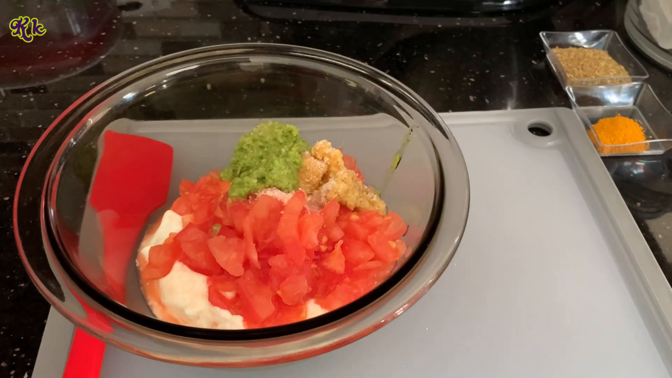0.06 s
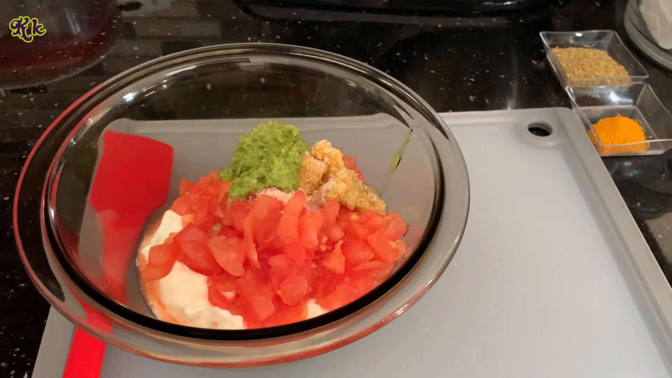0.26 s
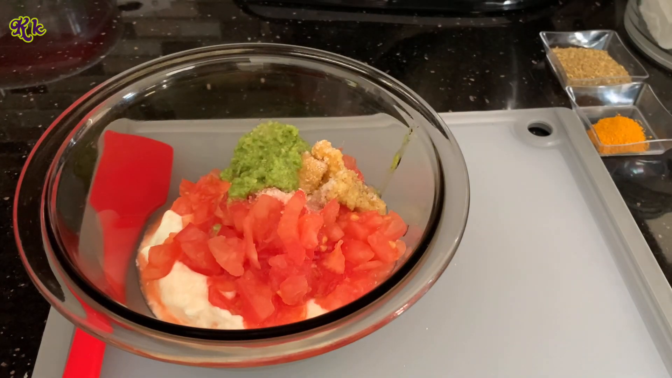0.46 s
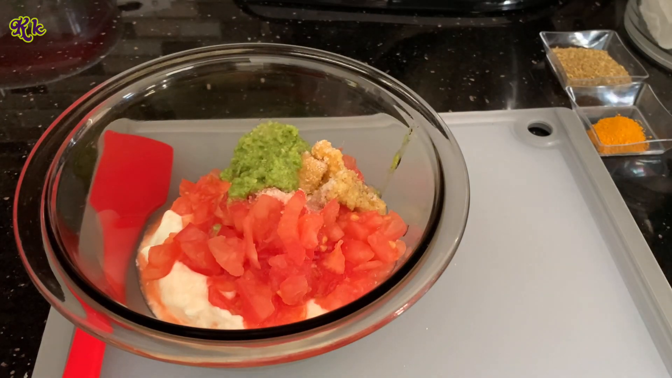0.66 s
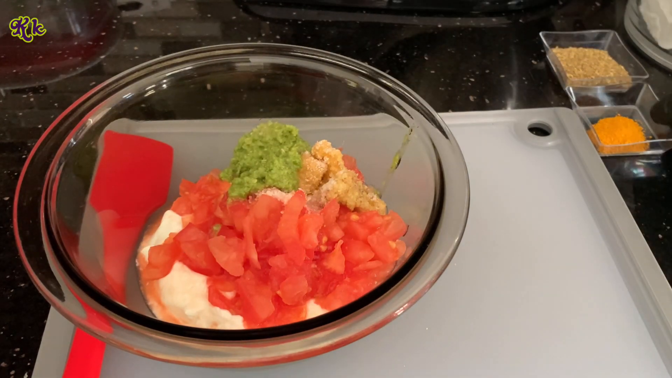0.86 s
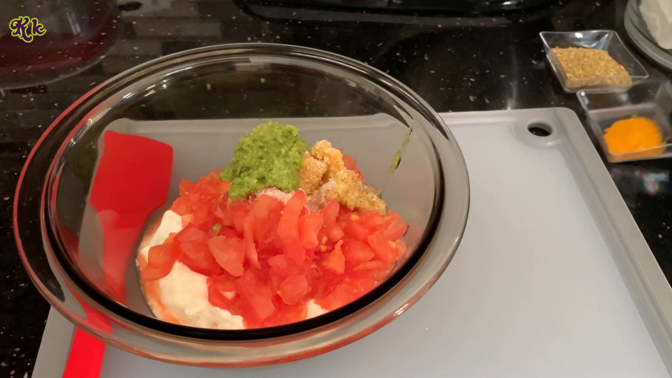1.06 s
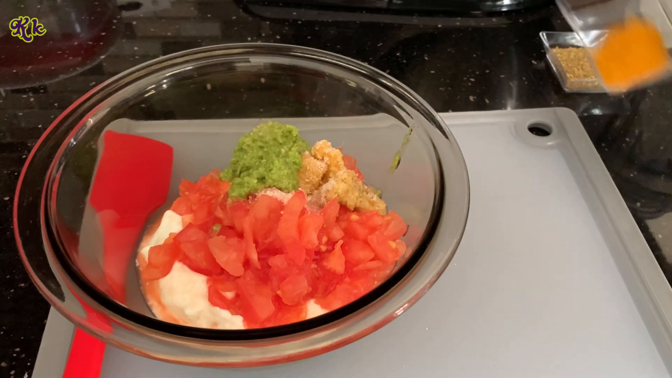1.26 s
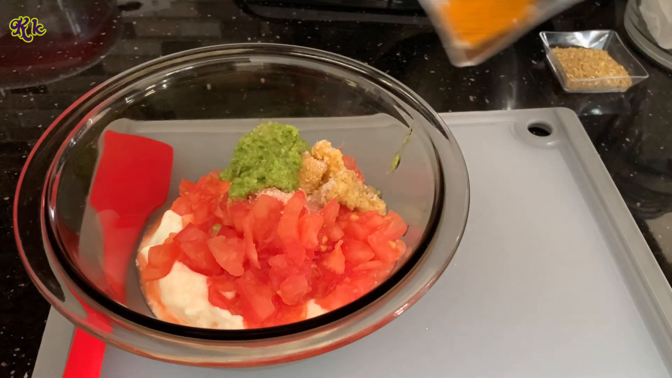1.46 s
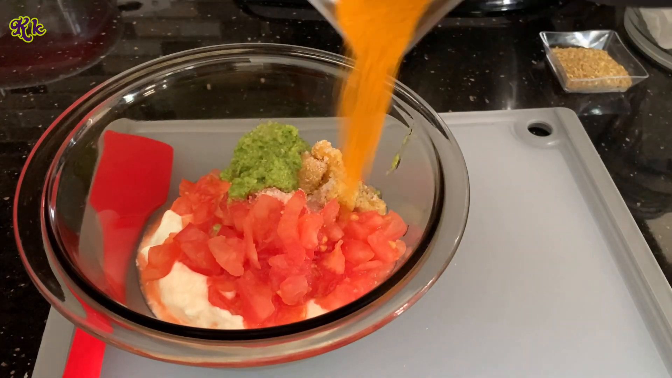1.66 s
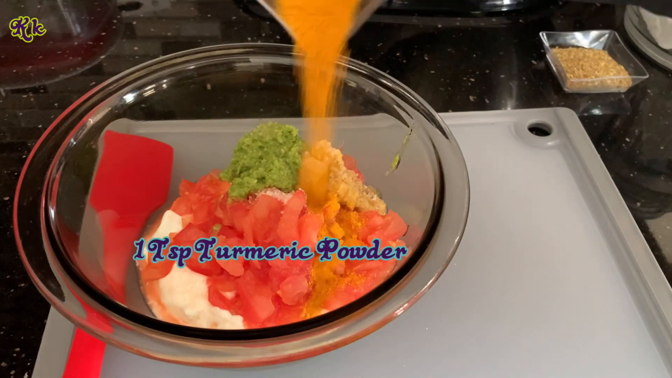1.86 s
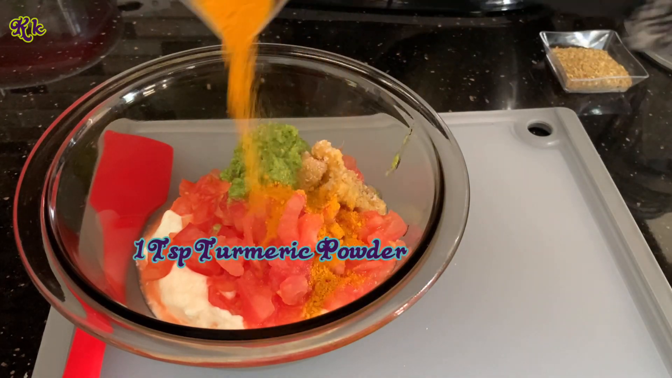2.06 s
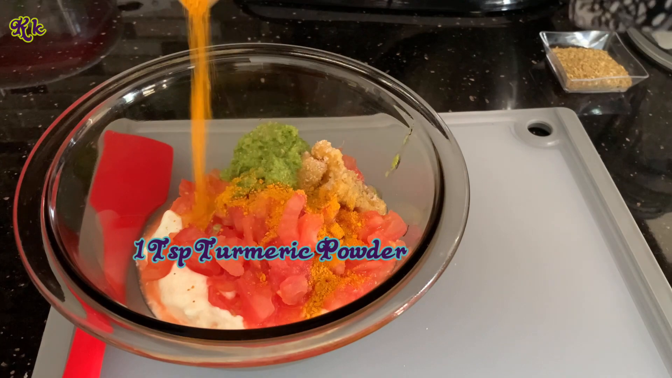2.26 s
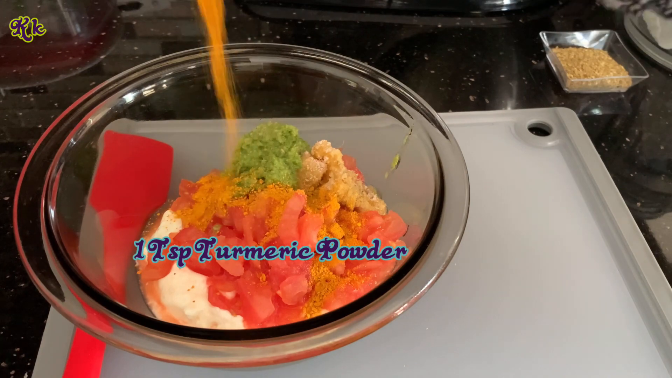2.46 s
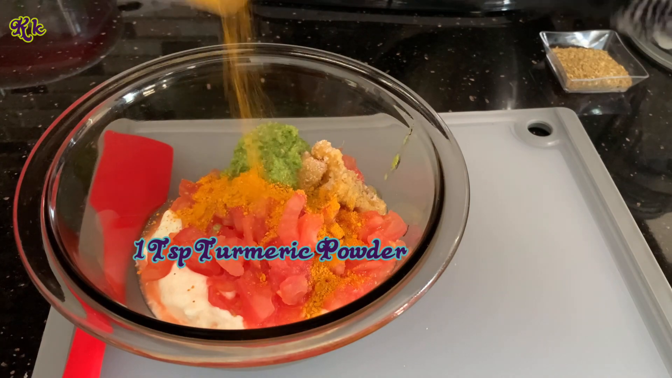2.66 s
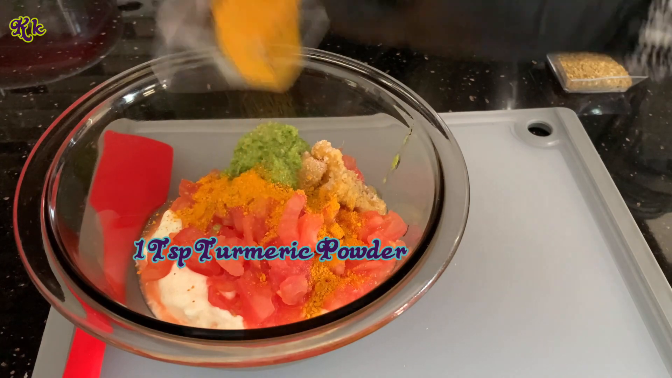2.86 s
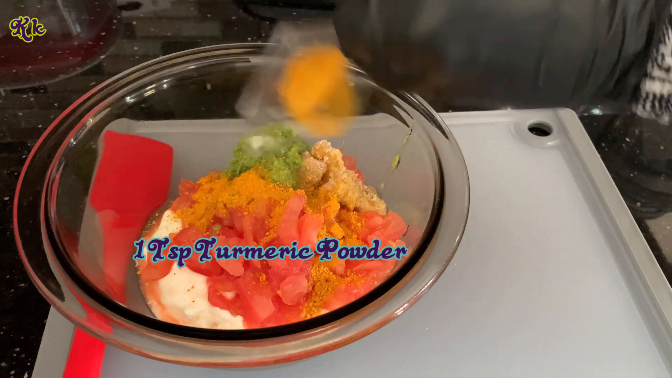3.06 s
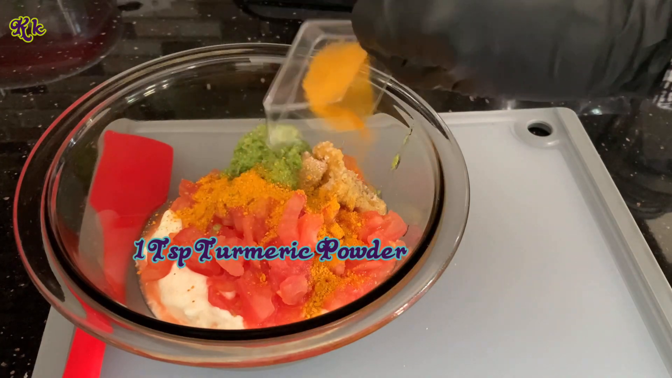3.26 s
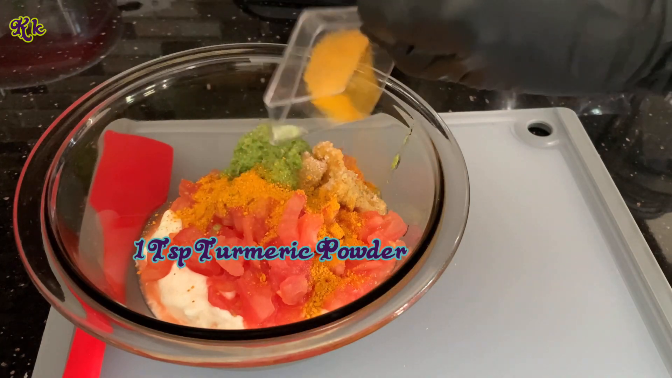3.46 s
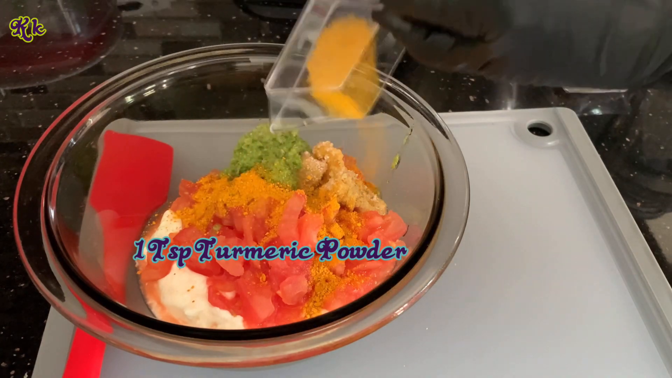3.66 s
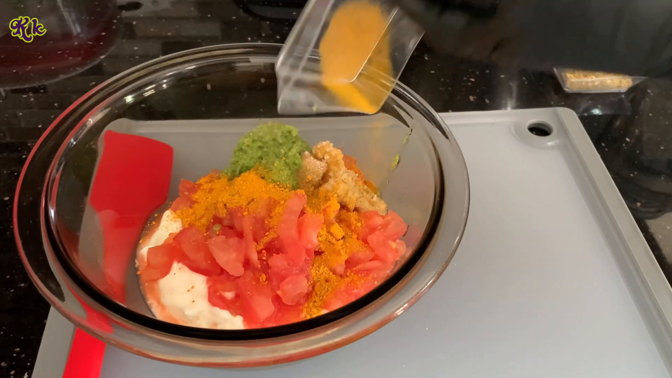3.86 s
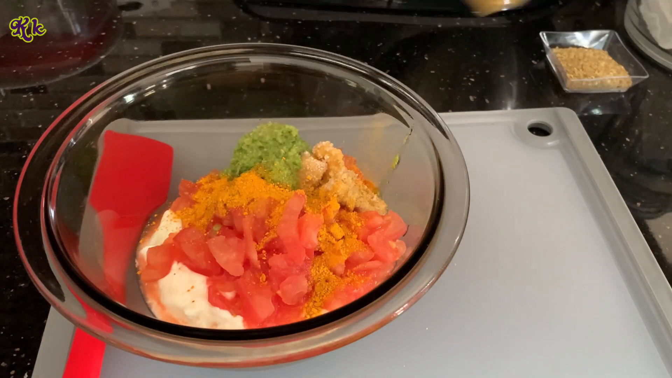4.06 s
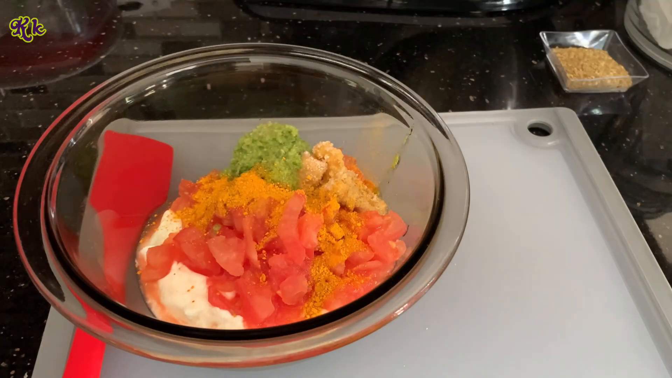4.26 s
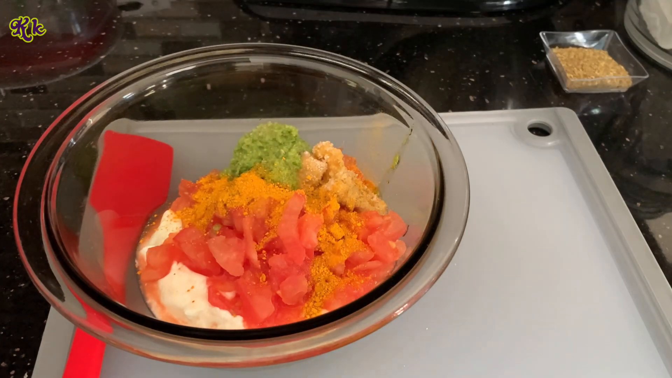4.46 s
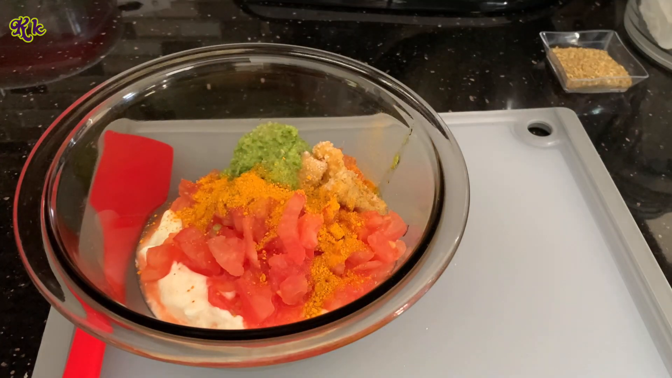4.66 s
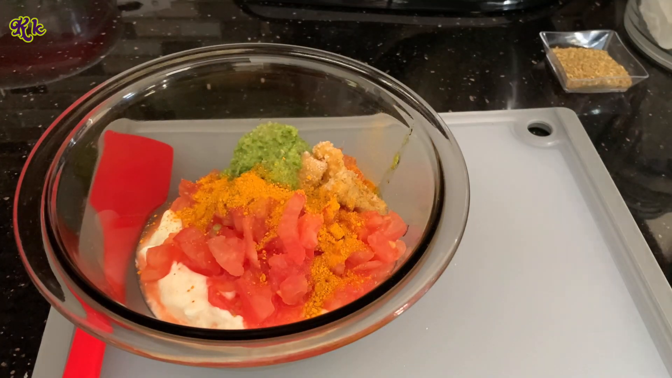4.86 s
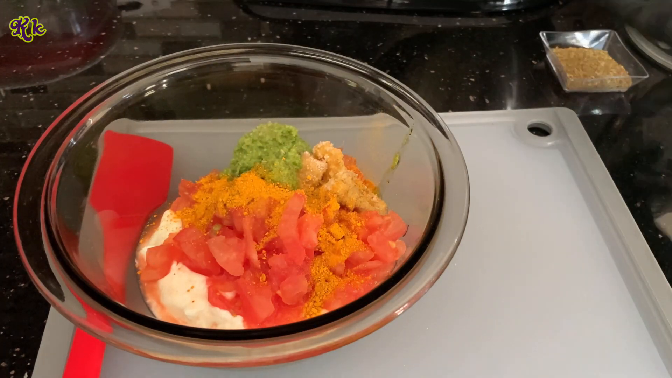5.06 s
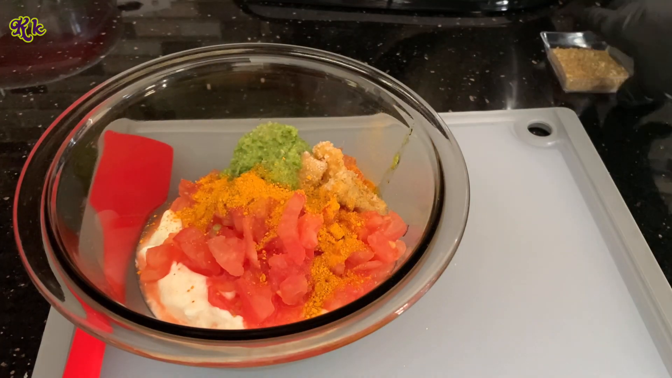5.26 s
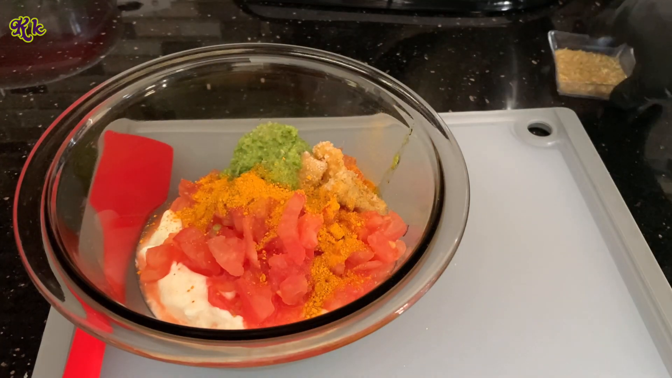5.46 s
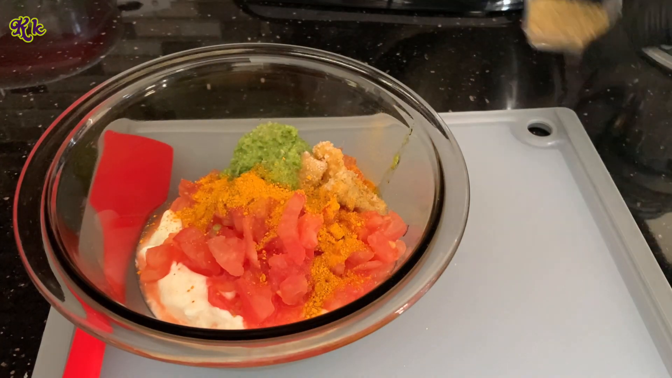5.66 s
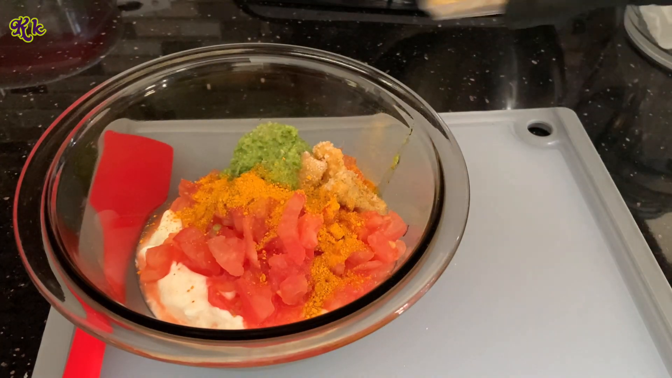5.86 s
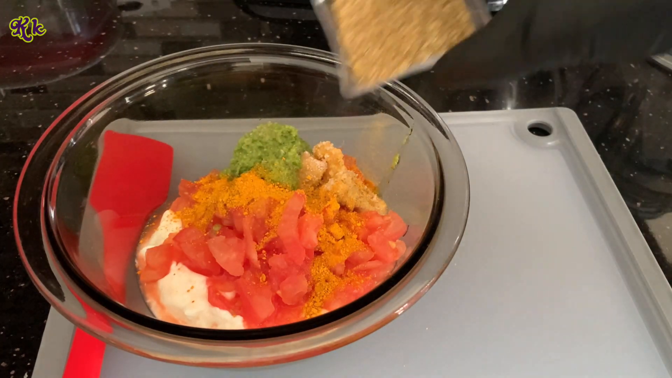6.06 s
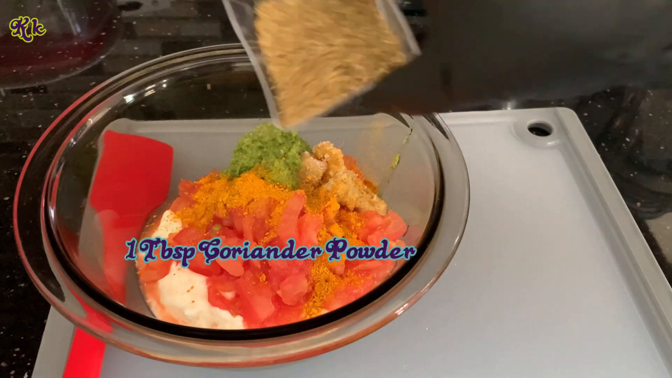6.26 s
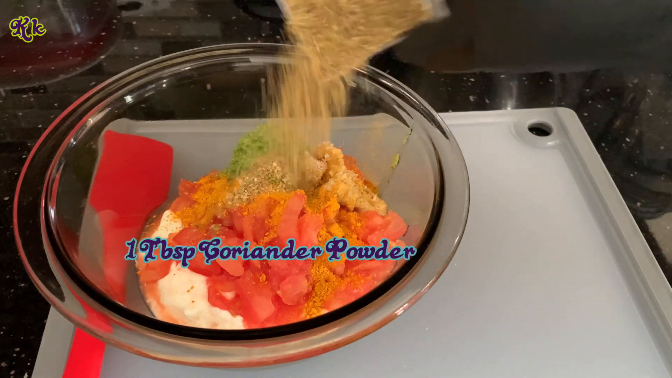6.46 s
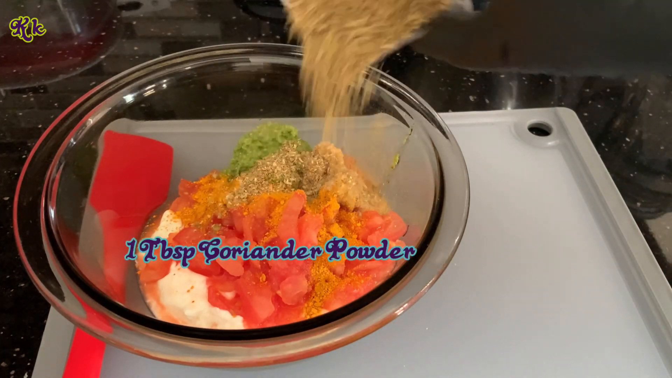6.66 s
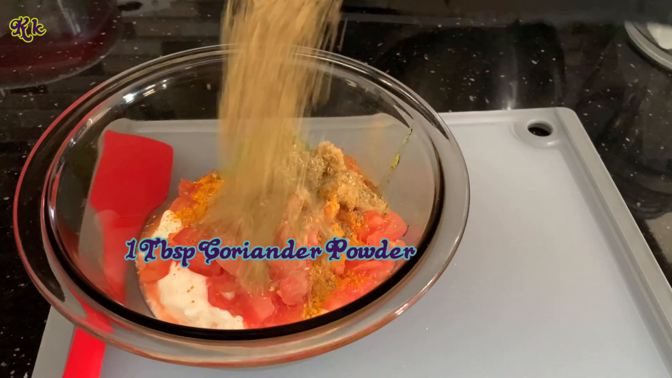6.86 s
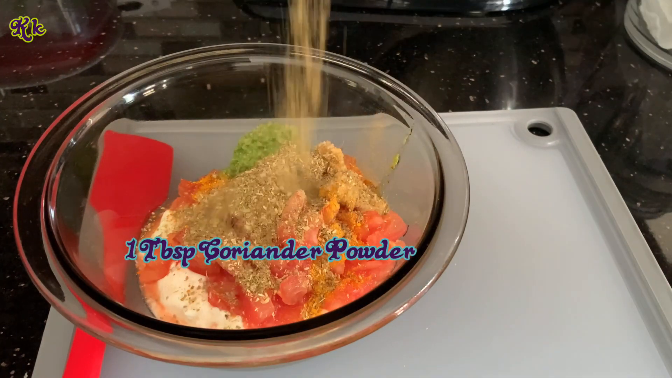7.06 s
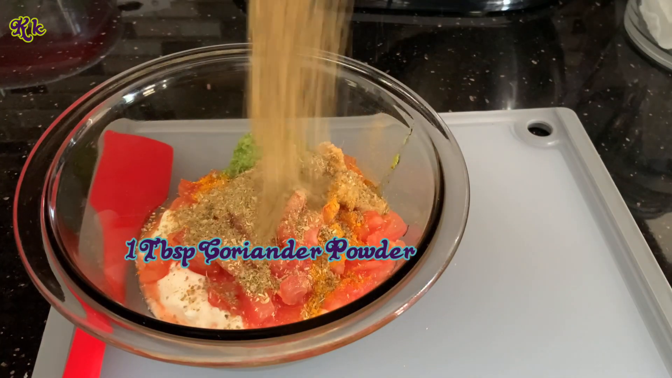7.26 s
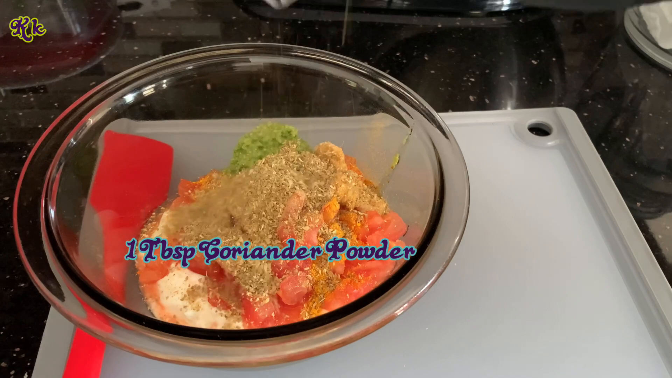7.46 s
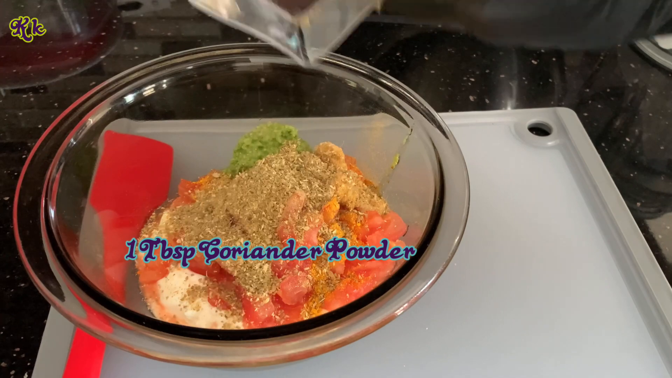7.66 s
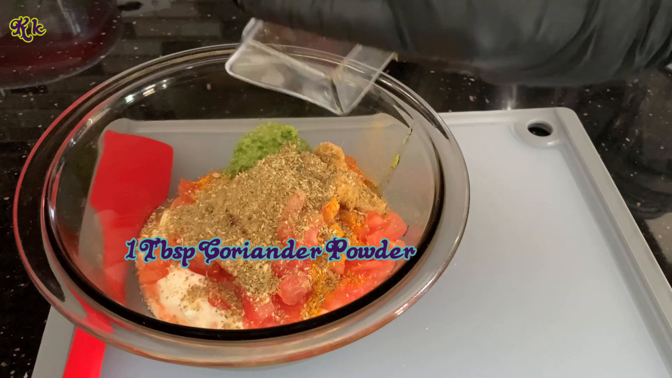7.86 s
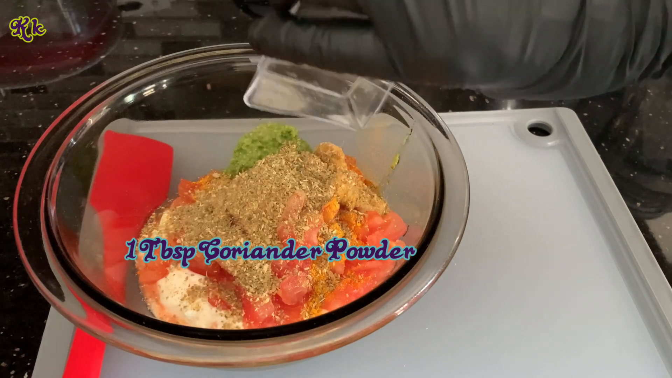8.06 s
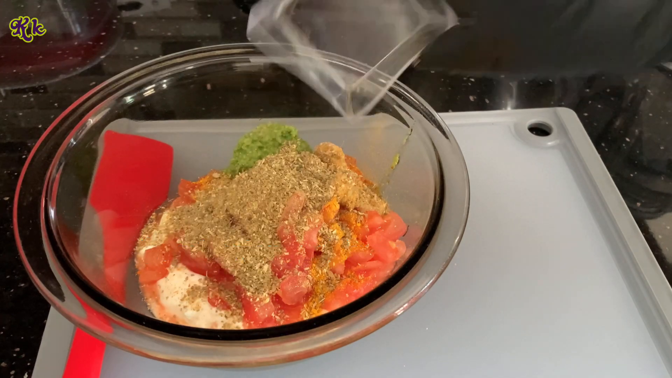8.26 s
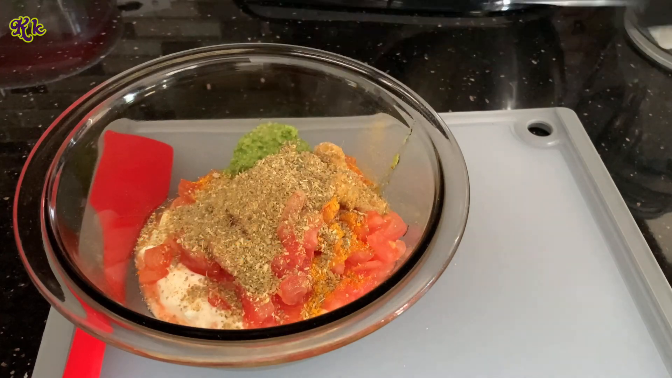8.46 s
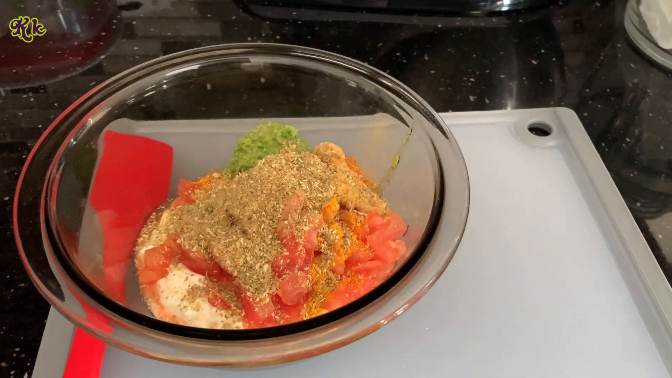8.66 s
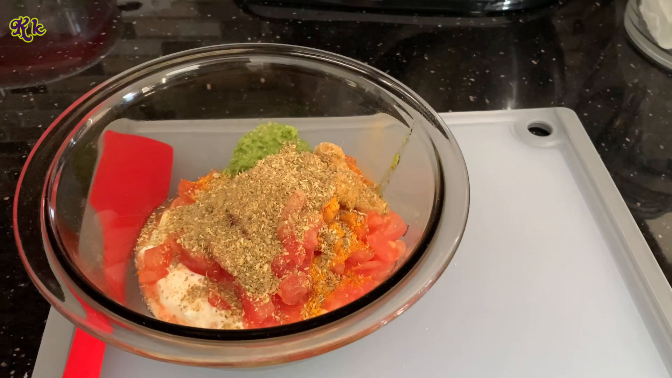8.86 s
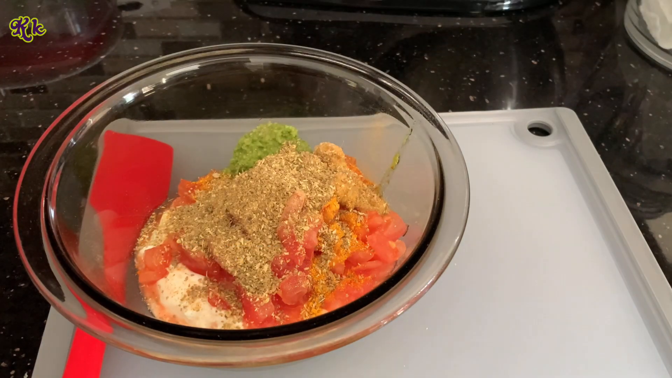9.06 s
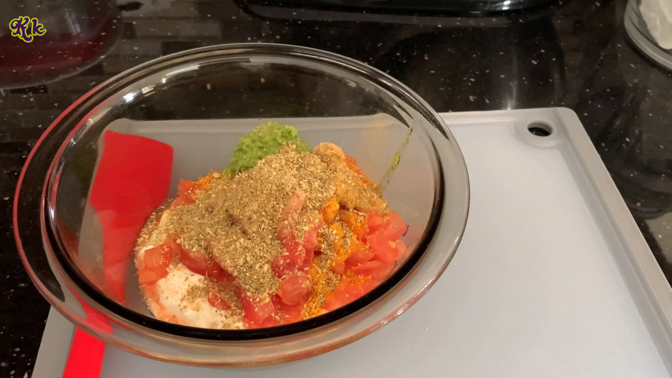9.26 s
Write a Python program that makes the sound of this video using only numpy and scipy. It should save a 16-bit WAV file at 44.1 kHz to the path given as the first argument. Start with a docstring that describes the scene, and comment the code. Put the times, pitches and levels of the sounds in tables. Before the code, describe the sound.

A quiet small kitchen, heard close in stereo, with soft low rumble and a faint wavering appliance hum, slightly stronger on the right. At about 0.15 to 0.35 seconds a tight flurry of hard plastic clacks on stone grows louder as a dish is picked up. Near-quiet follows until a very soft tick at 3.1, then three clearer light taps on a glass bowl at 3.2, 3.55 and 3.75, each with a tiny rebound and a slight glassy ring. Around 4.55 to 4.8 the dish clacks on the counter, ending in one sharp, bright hit. From 6.1 to 7.5 falling powder makes an extremely faint high hiss. Two hard, heavier knocks strike the bowl rim at 7.95 and 8.1, with a short high ring. Softer counter clacks come at 8.9 and 9.15 to 9.3, fading into short, lively room echoes.

```python
"""Hard clacks on a stone counter come first: two small plastic spice dishes are picked up.
Light taps make a glass bowl ring and a dish is set down; powder hisses, two hard knocks hit
the rim and a dish clacks on the counter again. A small kitchen echoes and an appliance hums.
Knocks are shaped noise bursts, rings are fading sine waves, and hiss, hum and echoes are filtered noise."""
import sys
import numpy as np
from scipy import signal
from scipy.fft import rfft, irfft, next_fast_len
from scipy.io import wavfile
from scipy.ndimage import uniform_filter1d

SR = 44100
rng = np.random.default_rng(int(sys.argv[2]) if len(sys.argv) > 2 else 0)


def materialize(psi):
    """Save the field psi as 16-bit PCM at rate SR to the path in sys.argv[1].

    A 1-D psi becomes a single channel; in a 2-D psi each row is a channel.
    """
    bounded = np.clip(np.atleast_2d(psi).T, -1, 1)
    quanta = np.round(bounded * 32767).astype(np.int16)
    wavfile.write(sys.argv[1], SR, quanta)


N = 411012

# Notes of the ringing bowl; a note may have a close second tone, so that it swells and dips:
# f/Hz, t60/s, level when tapped/dB, level when knocked/dB, left minus right/dB,
# distance of the second tone/Hz, share of the second tone 0-1
BOWL_NOTES = [(1003, 1, -27.5, -41, -1, 3.3, 0.3), (1038.7, 0.89, 4.5, -48.5, 2.5, 1, .05),
              (1010, 0.077, -26, -8.5, 3.5, 22, 1), (1105, .14, -31, -18.5, 2, 20, .2),
              (1260, 0.19, 2.5, -38.5, 0.5, 6.8, 0.06), (1880, .35, -27, -36.5, 7, 16, 0.2),
              (1800, 0.73, -19.5, -38.5, 12.5, 18, 0.6), (2080, 0.56, -20, -26.5, 4.5, 33, 0.5),
              (2794, .5, -17, -10, 3, 13, .65), (3000, .2, -16, -25.5, -10, 18, 0.2),
              (4500, 0.068, -1, -21, -5, 12, 0.2), (4900, .1, -27, -24.5, 2, 23, .2),
              (5117, 0.14, -8.5, -1, -2.5, 22, .1), (5106, 0.3, -43, -19.5, 9, 15, 0.2),
              (8900, .12, -7, -41.5, 6.5, 24, .2), (9700, .09, -8, -24, -4, 46, 0),
              (13700, .08, -14, -37.5, -2.5, 30, .3)]
# Light taps of the first dish on the bowl:
# t/s, contact level/dB, hollow of the dish f/Hz, bowl ring level/dB,
# rebound level relative to the tap/dB, bowl note favoured by the spot struck f/Hz
BOWL_TAPS = [(3.0811, -12.5, 1320, -53, -23, 2792), (3.2206, 0.5, 1240, -41.5, -7, 5110),
             (3.5495, 1, 1690, -47, -11, 5110), (3.7385, 0.5, 1690, -43.5, 0, 2792)]
# Tone of a tap: f/Hz, level per Hz/dB
TAP_TONE = [(150, -10), (430, 9.5), (720, -22.5), (1100, 1.5), (2200, 6), (3500, -9.5), (5000, 0),
            (6200, -8.5), (7700, 0.5), (10000, 2), (13000, 5), (16000, -10)]
TAP_T60_S, REBOUND_S = 0.044, 0.0086
TAP_TREBLE_DB, TREBLE_DB_PER_DB = 3, 0.95  # a stronger touch is brighter
SPOT_DB = 8.5  # lift of the favoured bowl note


def bowl_taps():
    """The dish edge flicks the glass and falls back once: two short ticks, and the bowl rings."""
    out = np.zeros((2, N))
    hz, t60, note_db, _, pan_db, split, second = np.transpose(BOWL_NOTES)
    for at, db, hollow_hz, ring_db, rebound_db, favoured_hz in BOWL_TAPS:
        touches = ((at, db), (at + REBOUND_S, db + rebound_db))
        for touch_at, touch_db in touches:
            treble_db = TAP_TREBLE_DB + TREBLE_DB_PER_DB * touch_db
            tick = contact(TAP_TONE, treble_db, hollow_hz, TAP_T60_S, lead_ms=0.097,
                           hollow_db=11.0, crack=0.56, treble_life=0.22)
            add(out, touch_at, undb(touch_db) * tick)
        spot_db = SPOT_DB * hollow(hz, favoured_hz)
        gains = undb(ring_db + note_db + spot_db) * pan(pan_db)
        add(out, at, ring(hz, t60, gains, 0.31, split, second))
    return out


# Hard knocks of the second dish on the rim: t/s, contact level/dB, treble level/dB, bowl ring level/dB
BOWL_KNOCKS = [(7.945, 12, -5, -11.5), (8.1181, 12, 2, -12)]
# Tone of a knock: f/Hz, level per Hz/dB
KNOCK_TONE = [(150, -21), (330, -20), (600, -2), (800, -24), (1050, -3), (1380, -19.5), (1620, 3.5),
              (1860, 4.5), (2100, 4.5), (2500, -4), (3250, 2), (4000, -19), (4900, -2.5), (6500, -30.5),
              (8200, -21), (13000, -11), (16000, -36.5)]
KNOCK_T60_S, KNOCK_HOLLOW_HZ = 0.02, 1010
KNOCK_LEAD_MS = 0.24  # the left side hears it first


def bowl_knocks():
    """The dish lands flat on the rim: a duller, heavier blow that wakes the high bowl notes."""
    out = np.zeros((2, N))
    hz, t60, _, note_db, pan_db, split, second = np.transpose(BOWL_NOTES)
    side_phase = 2 * np.pi * hz * KNOCK_LEAD_MS / 1000
    for at, db, treble_db, ring_db in BOWL_KNOCKS:
        blow = contact(KNOCK_TONE, treble_db, KNOCK_HOLLOW_HZ, KNOCK_T60_S, KNOCK_LEAD_MS,
                       hollow_db=8.5, crack=0.3, treble_life=0.53)
        gains = undb(ring_db + note_db) * pan(pan_db)
        add(out, at, undb(db) * blow)
        add(out, at, ring(hz, t60, gains, side_phase, split, second))
    return out


# Dishes on the counter; a gripped dish rings little, one that is let go rings freely:
# t/s, contact level/dB, treble level/dB, contact t60/s,
# ring level relative to the contact/dB, dish note favoured by the corner that lands f/Hz
COUNTER_CLACKS = [(0.1488, 1.5, -5.5, 0.07, -55, 7554), (0.2093, -11, -13.5, 0.11, -29, 4550),
                  (0.2512, 0, -9, 0.081, -41, 4550), (0.2924, -4.5, -14.5, 0.17, -55, 9446),
                  (0.3129, 4.5, -3, 0.098, -47, 2070), (0.326, 8, -9, 0.13, -52, 2130),
                  (4.561, 3.5, -12, 0.028, -39.5, 3112), (4.699, -7.5, -10, 0.05, -36, 7020),
                  (4.7237, -3, -14, 0.38, -26.5, 5380), (4.7703, 13.5, 3, 0.05, -40.5, 5840),
                  (8.9317, -1.5, -8, 0.068, -34, 2560), (9.1412, -2, -9, 0.067, -39, 13300),
                  (9.176, -12, -15, 0.73, -57, 2560), (9.285, -18.5, -16.5, 0.024, -39, 3112)]
# Notes of a spice dish: f/Hz, t60/s, level/dB
DISH_NOTES = [(1358, .15, -1), (1760, .1, -1), (2070, .08, -1), (2560, .11, -7), (3112, .11, -2),
              (4550, .08, -7), (5380, .2, -8), (5590, .45, -14), (6121, .1, -11), (7020, .08, -4),
              (7554, .13, -6), (7980, .09, -4), (8520, .08, -6), (9005, .1, -4), (9446, .1, -4),
              (10150, .1, -5), (10430, .09, -5), (13300, .07, -7)]
# Tone of a clack: f/Hz, level per Hz/dB
CLACK_TONE = [(150, -19), (620, -16.5), (850, -7), (1100, -9), (1450, -2), (2300, 0), (2900, -3),
              (3700, -8.5), (4700, -3), (7500, 5), (10000, 0), (14000, -3), (16000, -17.5)]
DISH_HOLLOW_HZ = 1898
DISH_HOLLOW_DB, HOLLOW_DB_PER_DB = 8.5, -0.4  # the hollow stands out less in a bright clack
CORNER_DB = 13  # lift of the favoured dish note
COUNTER_LEAD_MS = -0.206  # negative: the right side hears it first


def counter_clacks():
    """A dish rocks and settles on stone; each corner favours one of its notes."""
    out = np.zeros((2, N))
    hz, t60, note_db = np.transpose(DISH_NOTES)
    side_phase = 2 * np.pi * hz * COUNTER_LEAD_MS / 1000
    for at, db, treble_db, contact_t60, ring_db, favoured_hz in COUNTER_CLACKS:
        hollow_db = DISH_HOLLOW_DB + HOLLOW_DB_PER_DB * treble_db
        clack = contact(CLACK_TONE, treble_db, DISH_HOLLOW_HZ, contact_t60, COUNTER_LEAD_MS,
                        hollow_db, crack=0.2, treble_life=0.82)
        corner_db = CORNER_DB * hollow(hz, favoured_hz)
        bright_db = 0.85 * treble_db * treble(hz)
        gains = undb(ring_db + note_db + corner_db + bright_db) * pan(read(SIDE_BALANCE, hz))
        add(out, at, undb(db) * clack)
        add(out, at, undb(db) * ring(hz, t60, gains, side_phase))
    return out


# How loud the falling powder is: t/s, level/dB
POWDER_LEVEL = [(6.1, -96), (6.3, -75.5), (6.5, -85), (6.9, -75.5), (7.3, -72.5), (7.5, -90)]


def powder():
    """Countless tiny grains of uneven strength patter down as a faint, high hiss."""
    strength = undb(3.0 * rng.exponential(size=N))
    grains = rng.standard_normal((2, N)) * strength
    highpass = signal.butter(2, 7000, "high", fs=SR, output="sos")
    hiss = level(signal.sosfilt(highpass, grains), 0)
    at, db = np.transpose(POWDER_LEVEL)
    return hiss * np.interp(np.arange(N) / SR, at, undb(db), left=0, right=0)


# Tone of the room rumble and hiss: f/Hz, level per Hz/dB
AIR_TONE = [(15, -55.5), (25, -12), (43, -8), (70, 0.5), (127, -5.5), (170, -11.5), (206, -7.5),
            (263, -10.5), (476, -13), (624, -24.5), (1290, -27), (1790, -34), (2000, -33.5), (4030, -30),
            (16000, -47)]
AIR_DB = -52.7  # average over both sides, before panning
# How alike the left and right noise is: f/Hz, likeness 0-1
SIDE_LIKENESS = [(60, 0.8), (130, 1), (300, 0.86), (700, .5), (3000, 0.2), (15000, 0.1)]
# Appliance hum, made of narrow noise bands: f/Hz, width/Hz, level/dB
HUM_BANDS = [(58.3, 1, -74), (121, 2, -66), (204.5, 5.7, -59), (364, 8.3, -72.5), (463.7, 12, -73.5),
             (1284, 46, -75.5), (2070, 170, -76), (4000, 100, -82.5)]


def background():
    """Rumble and hiss are shaped noise; narrow noise bands make a wavering hum, louder on the right."""
    size = next_fast_len(N, real=True) * 2
    hz = bins(size)
    noise = side_noise(size, read(SIDE_LIKENESS, hz), lead_ms=0.43)
    air = irfft(noise * undb(read(AIR_TONE, hz)))[:, :N]
    hum_power = 0
    for centre, width, db in HUM_BANDS:
        shape = np.exp(-np.pi * ((hz - centre) / width) ** 2)
        hum_power = hum_power + undb(db) ** 2 / width * shape
    # the far end of the same noise, so the hum does not copy the air
    hum = irfft(noise * np.sqrt(hum_power * SR / 2))[:, -N:]
    return (level(air, AIR_DB) + hum) * pan(-2.3)


# Kitchen echoes: f/Hz, t60/s, level/dB
KITCHEN_ECHOES = [(250, 0.443, -24.5), (1000, 0.95, -8), (1994, 0.99, -15), (4850, 0.78, -4.5),
                  (8200, 0.58, -16), (15000, 0.3103, -28.5)]


def kitchen(x, size=32768):
    """Dense echoes build up over a few milliseconds, then fade at a rate set for each octave."""
    t, hz = np.arange(size) / SR, bins(size)
    noise, response = rfft(rng.standard_normal((2, size))), 0
    at, t60s, dbs = np.transpose(KITCHEN_ECHOES)
    for centre in 125 * 2 ** np.arange(8):  # octave bands in Hz
        t60 = np.interp(np.log(centre), np.log(at), t60s)
        db = np.interp(np.log(centre), np.log(at), dbs)
        band = np.maximum(1 - abs(np.log2((hz + 1) / centre)), 0)
        build_up = (1 - fade(t, 0.0045)) ** 2
        tail = (fade(t, t60) + 2.9 * fade(t, 0.13)) * build_up
        tail = tail / np.sqrt(np.sum(tail ** 2))
        response = response + irfft(noise * band) * tail * undb(db)
    return signal.fftconvolve(x, response, axes=1)[:, :N]


# Loudness difference of the two sides: f/Hz, left minus right/dB
SIDE_BALANCE = [(300, -2), (1200, -3), (2500, -1.5), (4800, -2.5), (7500, -0.5), (16000, 1)]
ATTACK_S = 0.0048  # time for the force of a contact to build up


def contact(tone, treble_db, hollow_hz, t60, lead_ms, hollow_db, crack, treble_life, size=8192):
    """Clack of unit energy: a crack, then a dense noisy decay with one hollow resonance."""
    hz, t = bins(size), np.arange(size) / SR
    noise = side_noise(size, 0.72, lead_ms)
    lows = irfft(noise * (1 - treble(hz))) * (fade(t, t60) + crack * fade(t, 0.00464))
    highs = irfft(noise * treble(hz)) * (fade(t, t60 * treble_life) + crack * fade(t, 0.002))
    burst = rfft((lows + highs) * (1 - fade(t, ATTACK_S)))
    # divide out the broad tone of the noise, so the wanted tone can replace it
    broad = np.sqrt(uniform_filter1d(abs(burst) ** 2, size=80))
    # random unevenness makes the treble of each contact patchy
    ripple = uniform_filter1d(rng.standard_normal(len(hz)), size=24)
    ripple = level(uniform_filter1d(ripple, size=24), 0)
    tone_db = read(tone, hz) + (treble_db + 3 * ripple) * treble(hz)
    tone_db = tone_db + hollow_db * hollow(hz, hollow_hz)
    gain = undb(tone_db) * pan(read(SIDE_BALANCE, hz))
    sound = irfft(burst * causal(gain / broad))
    return sound / np.sqrt(np.sum(sound ** 2) / 2)


def ring(hz, t60, gains, side_phase, split=0, second=0):
    """Fading sine notes, phase-shifted between sides; an opposed second tone makes a note swell and dip."""
    t = np.arange(int(max(t60) * 1.2 * SR))[:, None] / SR
    phase = np.array([[1], [-1]]) * side_phase / 2
    phase = phase + 0.17 * rng.standard_normal((2, len(hz)))
    swelling = 1 - second * np.exp(2j * np.pi * split * t)
    notes = np.exp(2j * np.pi * hz * t) * swelling * fade(t, t60)
    notes = notes * (1 - fade(t, 0.0012))  # soft start
    return np.imag((gains * np.exp(1j * phase)) @ notes.T)


def side_noise(size, likeness, lead_ms):
    """Spectrum of two-sided white noise: a shared part, left first if lead is positive, plus separate parts."""
    noise = rfft(rng.standard_normal((3, size)))
    share = np.clip(likeness, 0, 1)
    delay = np.exp(1j * np.pi * np.array([[1], [-1]]) * bins(size) * lead_ms / 1000)
    return np.sqrt(share) * noise[0] * delay + np.sqrt(1 - share) * noise[1:]


def treble(hz):
    """Weight 0-1 of the treble range, half way up near 4000 Hz."""
    return 1 / (1 + (4000 / (hz + 1)) ** 4)


def hollow(hz, centre_hz):
    """Weight 0-1 of the resonance that the point of contact favours."""
    return 1 / (1 + ((hz - centre_hz) / 170) ** 2)


def causal(gain):
    """Minimum-phase response of a gain curve: nothing sounds before the blow."""
    cepstrum = irfft(np.log(gain))
    half = cepstrum.shape[-1] // 2
    cepstrum[..., 1:half] *= 2
    cepstrum[..., half + 1:] = 0
    return np.exp(rfft(cepstrum))


def undb(db):
    """Turn decibels into gain."""
    return 10 ** (np.asarray(db) / 20)


def read(points, hz):
    """Join (f, value) points with straight lines on a log-frequency axis."""
    at, value = np.transpose(points)
    return np.interp(np.log(np.maximum(hz, 1)), np.log(at), value)


def bins(size):
    """Frequencies of a spectrum in Hz."""
    return np.fft.rfftfreq(size, 1 / SR)


def fade(t, t60):
    """Exponential decay by 60 dB in t60 seconds."""
    return np.exp(-np.log(1000) * t / t60)


def pan(db):
    """Left and right gains for a left-minus-right level difference."""
    return undb(np.array([[1], [-1]]) * db / 2)


def level(x, db):
    """Scale to an rms (average) level."""
    return x * undb(db) / np.sqrt(np.mean(x ** 2))


def add(out, at, sound):
    """Mix a sound in at a time in seconds."""
    start = int(at * SR)
    out[:, start:start + sound.shape[1]] += sound[:, :N - start]


def scene():
    """Mix all sources; taps and clacks excite the kitchen echoes more strongly than knocks do."""
    taps, knocks, clacks = bowl_taps(), bowl_knocks(), counter_clacks()
    echoes = kitchen(undb(1.0) * taps + undb(-3.5) * knocks + undb(1.0) * clacks)
    return taps + knocks + clacks + echoes + powder() + background()


TOP_HZ = 16400


def record(dry):
    """One narrow treble band is faint; the sharpest peaks are rounded and the top is cut off."""
    hz = bins(2 * N)
    notch_db = -24 * np.exp(-((hz - 11700) / 480) ** 2)
    coloured = irfft(rfft(dry, 2 * N) * causal(undb(notch_db)))[:, :N]
    rounded = 0.95 * np.tanh(coloured / 0.95)
    lowpass = signal.ellip(8, 0.2, 70, TOP_HZ, fs=SR, output="sos")
    return signal.sosfilt(lowpass, rounded)


dry = scene()
out = record(dry)
materialize(out)
```